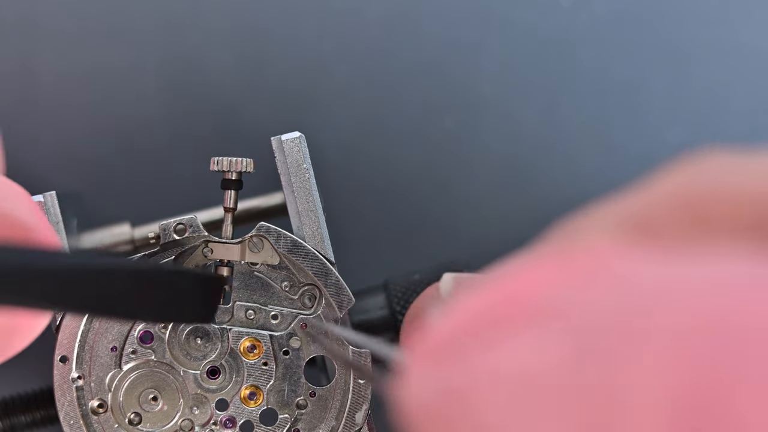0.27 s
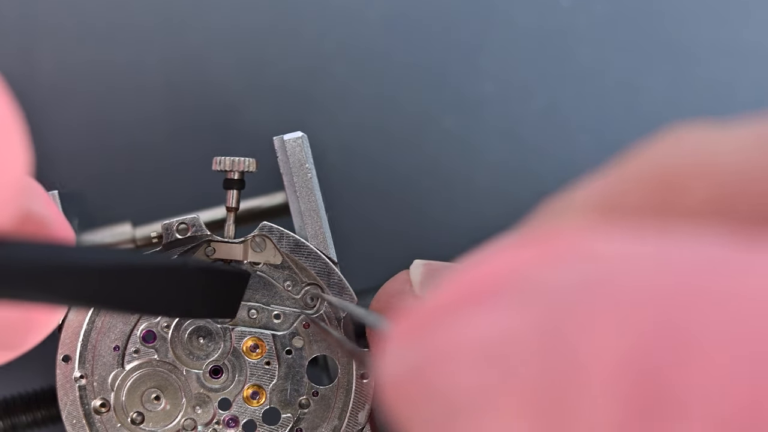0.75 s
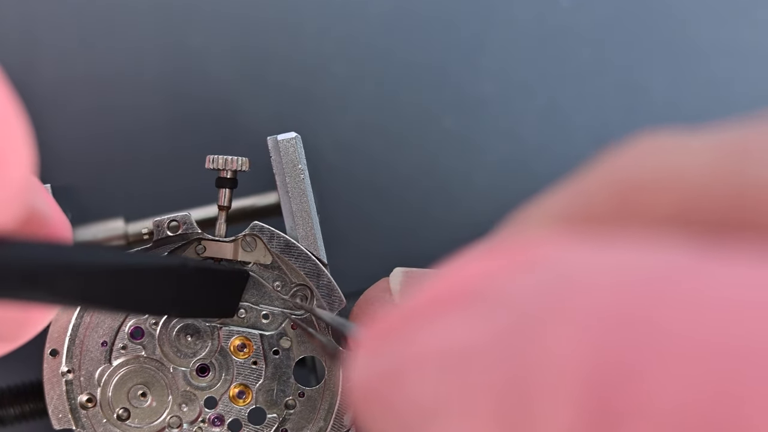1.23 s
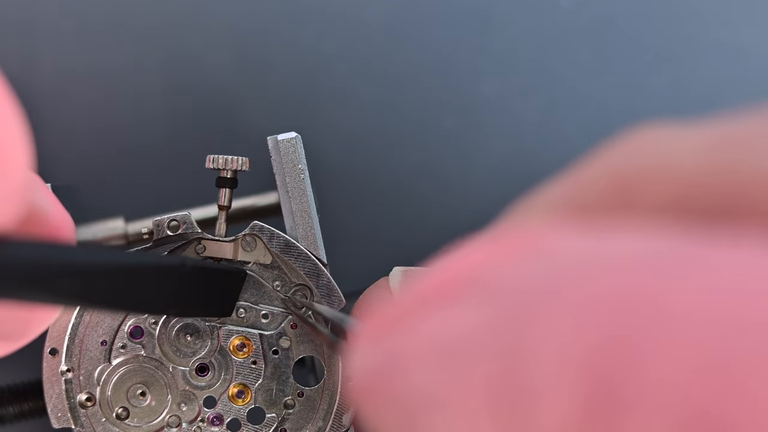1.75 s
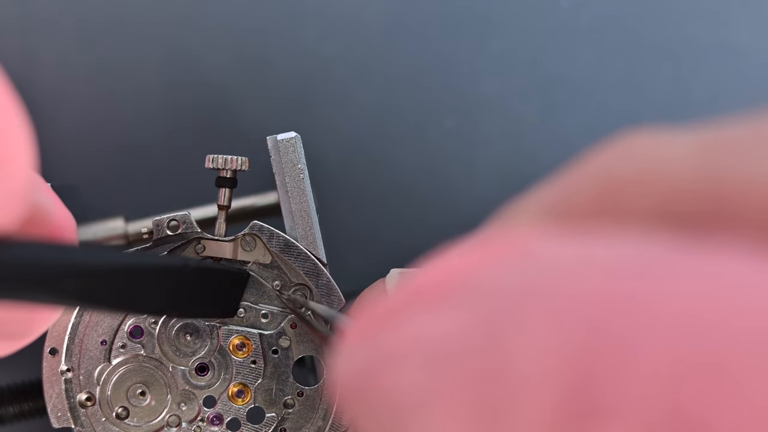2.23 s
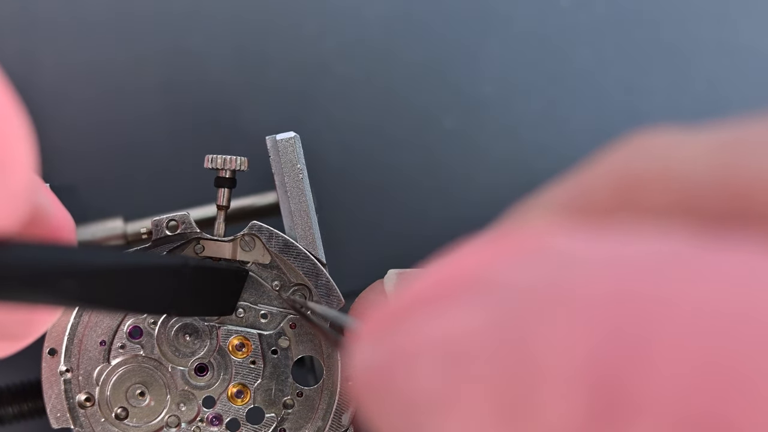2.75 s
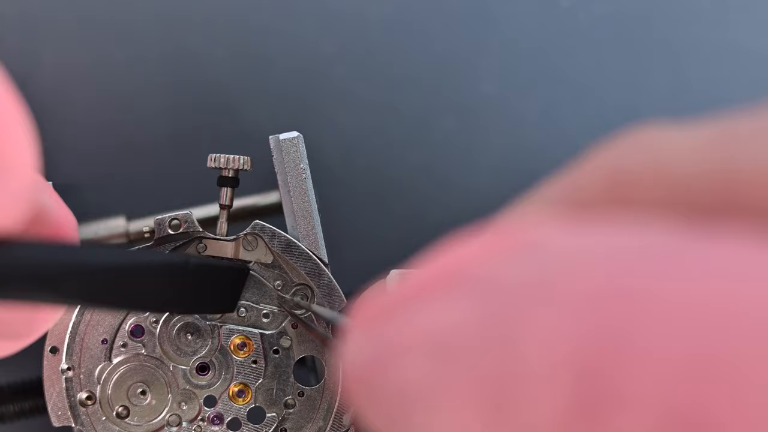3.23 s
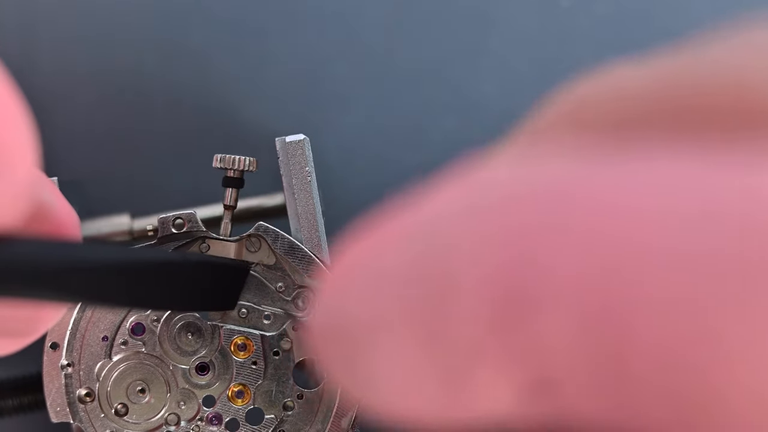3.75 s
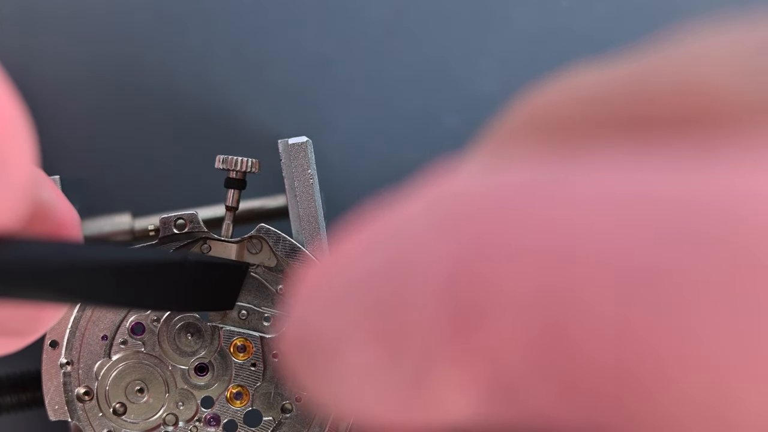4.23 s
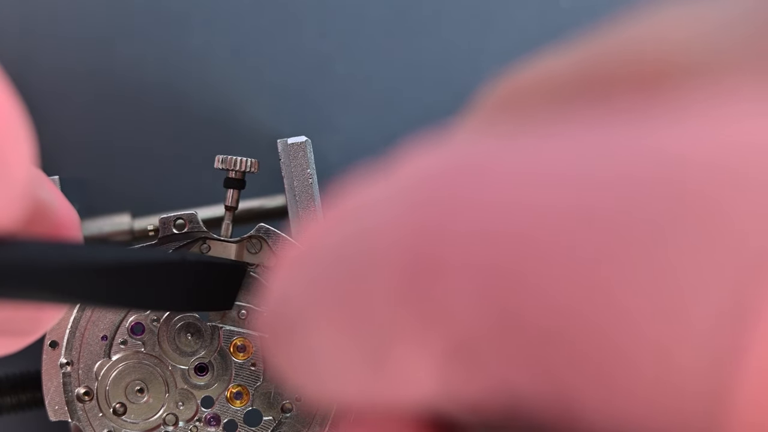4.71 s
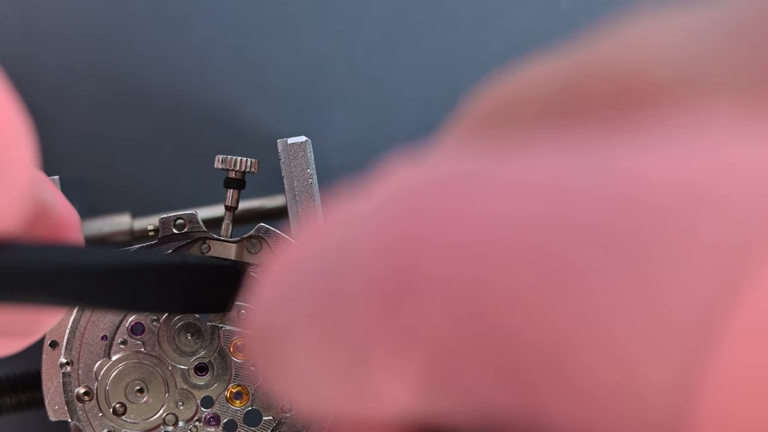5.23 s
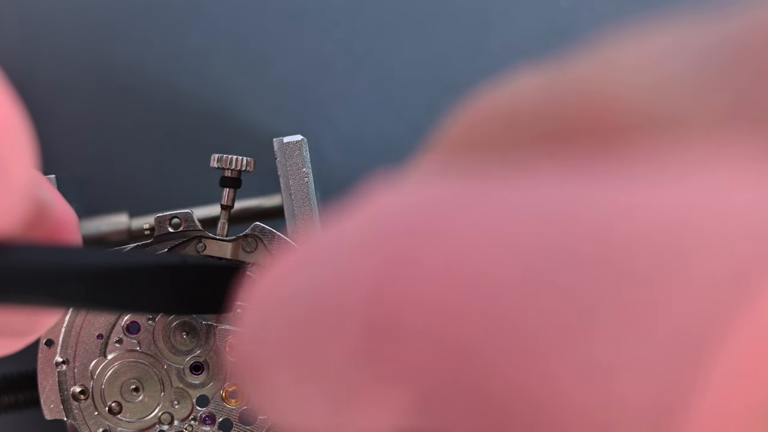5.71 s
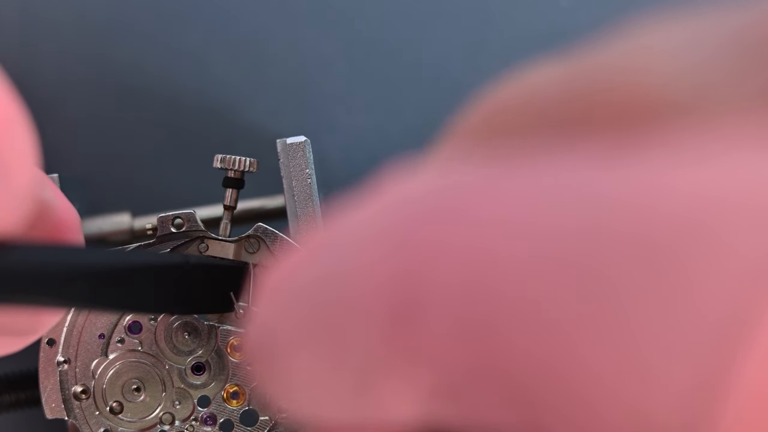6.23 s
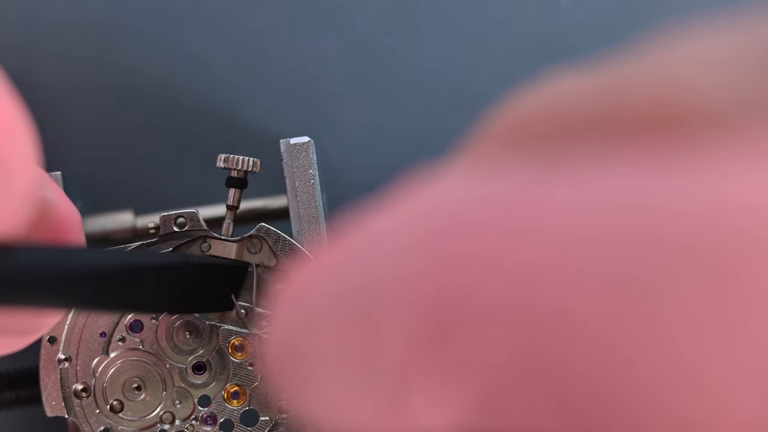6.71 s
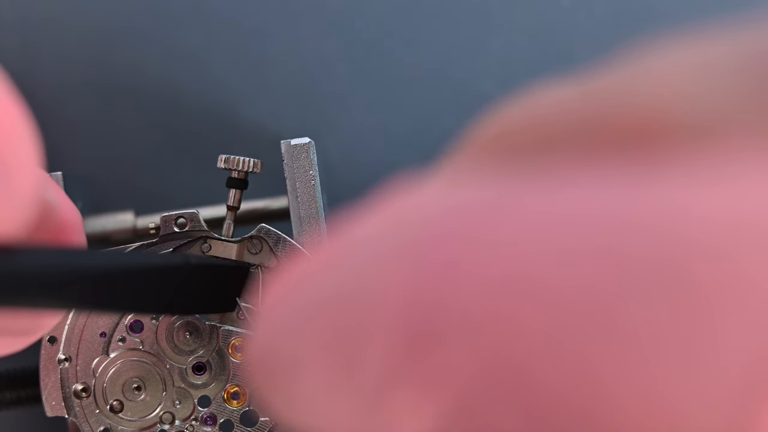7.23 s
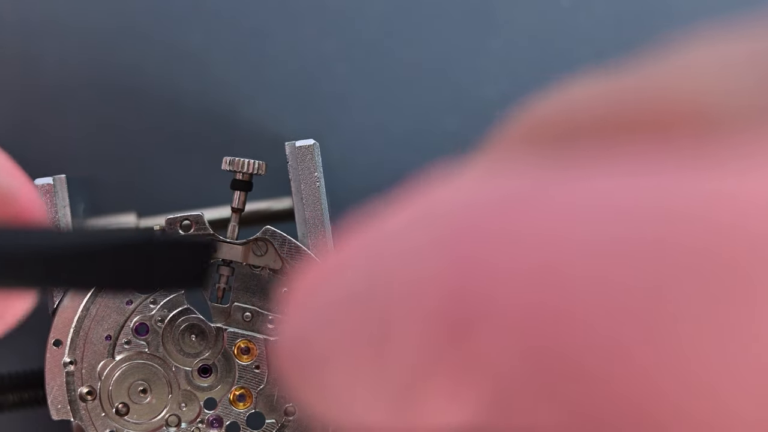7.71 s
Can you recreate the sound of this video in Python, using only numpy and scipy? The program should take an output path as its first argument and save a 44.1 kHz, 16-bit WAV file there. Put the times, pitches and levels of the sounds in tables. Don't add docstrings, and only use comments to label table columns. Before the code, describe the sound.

A close pair of microphones hears fine work at a bench in a small room. At 0 s a crisp steel snap sounds, then thin, bright tweezer ticks and faint grazes until 0.7. Dull, short bench knocks begin at 0.9 and cluster to 1.6, with small scuffs near 1.3. It stays sparse, with light nudges, until a loud hard snap and knock at 2.84. Knocks and ticks thicken from 3.1; at 3.5-3.65 a hand drags in a rough, juddering stick-slip scuff. Firm knocks with small metallic pings follow from 3.9 to 4.7, then more spaced ones around 5.1, 5.4 and 6. The sharpest snap cracks at 6.24. Light touches lead to knocks at 7.4 and 7.6 and a tight flurry of clicks at 7.75. Behind everything, a far piston engine hums low near 70 Hz, dipping slightly in pitch, wavering, strongest midway, fading after 6.3, with soft rumble and airy hiss.

```python
import sys
import numpy as np
from scipy import signal
from scipy.fft import rfft, irfft, next_fast_len
from scipy.io import wavfile
from scipy.ndimage import map_coordinates

SR = 44100
rng = np.random.default_rng(int(sys.argv[2]) if len(sys.argv) > 2 else 0)


def elevation(decibels):
    levels = np.asarray(decibels, float)
    return 10 ** (levels / 20)


def int16_out(signal):
    q = np.round(np.clip(np.atleast_2d(signal).T, -1, 1) * 32767)
    wavfile.write(sys.argv[1], SR, q.astype(np.int16))


N = 351036

# time_s, firing_hz, nearness_db
ENGINE_PASS = [(0.0, 75.5, -10.5), (0.8, 73.75, -2.5), (1.7, 72.73, -0.5), (2.3, 71.86, 5.5),
               (2.86, 70.8, 0), (3.4, 70.5, 3.5), (4.5, 69.65, 6.5), (4.96, 70.34, 0.5), (5.2, 70.64, 3),
               (5.6, 71.37, 5.5), (6.3, 73.45, -1), (6.8, 73.96, -5.5), (7.1, 72.76, -7.5),
               (7.56, 75.46, -8), (7.96, 74.8, -11)]
# level_db, nearness_share, drift_db_per_s (exhaust turns away)
ORDER_RULES = [
    (-51, 1, 0.3),
    (-57, 0.52, 0.13),
    (-53, 0.37, -1.5),
    (-52.5, 0.12, -0.56),
]
# time_s, gain_db, width_s
ORDER_PATHS = [
    [(4.8, -13, 0.11), (5.94, -12.5, 0.11), (6.63, -31, 0.062)],
    [(1.24, 6, 0.1), (1.7, -4, 0.3), (3.5, 10, 0.84), (4.78, 11, 0.14), (4.97, -8, 0.11), (6.0, -7.5, 0.22),
     (6.29, -21, 0.034), (6.54, 1.5, 0.093)],
    [(1.42, -19, 0.088), (2.22, -18.5, 0.17), (2.86, -7, 0.15), (4.2, 5.5, 0.69), (6.33, -23, 0.072)],
    [(0.2, 3, 0.16), (1.7, 4, 0.18), (2.1, -10, 0.076), (2.3, 11.5, 0.076), (4.4, -9, 0.55),
     (4.79, -16, 0.074), (4.96, 7, .08), (5.25, 10, 0.066), (6.25, -13, 0.12), (6.63, -12, 0.065),
     (7.09, -15, 0.17)],
]
# freq_hz, density_db_per_hz
ROAR_SPECTRUM = [(12, -45), (20, -7), (30, -12.5), (50, -3.5), (80, -5), (98, 0), (115, 3.5), (132, -4),
                 (170, -12.5), (205, -3.5), (245, -8), (274, -24), (390, -57), (660, -120)]
# freq_hz, density_db_per_hz
AIR_SPECTRUM = [(160, -20.5), (270, -3.5), (289, -1), (592, -10), (691, -9.5), (752, -12), (1040, -13),
                (2130, -20.5), (10100, -32), (14900, -33), (16000, -30.5)]
# freq_hz, correlation
LIKENESS = [(60, 0.76), (150, 1), (380, 0.71), (950, 0.49), (2380, -0.14), (5980, -0.062), (15000, -0.19)]
# freq_hz, t60_s
ROOM_DECAY = [(300, 0.14), (2000, 0.22), (15000, 0.31)]
# start_s, pitch_hz, peak_db
PINGS = [(1.246, 2270, -54), (1.279, 3010, -68), (3.128, 7740, -53.5), (3.1285, 14300, -55),
         (3.129, 2320, -45.5), (3.348, 2290, -60), (3.478, 2300, -58), (3.828, 4060, -63),
         (4.172, 3400, -63), (4.374, 3150, -57), (4.406, 3340, -54.5), (4.4065, 7800, -63),
         (4.616, 2500, -62), (4.651, 3390, -54.5), (4.652, 5370, -64), (5.37, 1420, -44.5),
         (5.377, 830, -46), (5.98, 3400, -53.5), (7.3825, 3400, -64), (7.7545, 4080, -58)]

# freq_hz, level_db, t60_s, rise_s
THUD_MODES = [(247, -7, 0.09, 0.0075), (521, 3.5, 0.062, 0.00396), (334, -16.5, 0.2, 0.0024)]
# freq_hz, level_db, t60_s, rise_s
BENCH_MODES = [(389, -12, 0.071, 0.00465), (483, -17, 0.068, 0.00405), (546, 0, 0.043, 0.00408),
               (590, 1, 0.059, 0.00398), (641.4, 2, 0.047, 0.00351), (697, -4.5, 0.064, 0.002916),
               (825, -6.5, 0.039, 0.002995)]
# freq_hz, level_db, t60_s, rise_s
UPPER_MODES = [(881, -11.5, 0.07, 0.00204), (916, -3, 0.039, 0.001947), (1037, -2, 0.031, 0.00149),
               (1178, -5.5, 0.024, 0.00152), (1353, -1.5, 0.0084, 0.001186)]
# freq_hz, level_db, t60_s, rise_s
HOLDER_MODES = [(1510, 6, 0.019, 0.0011), (1560, -3, 0.044, 0.00092), (1926, -4.5, 0.028, 0.00072),
                (2310, -2, 0.017, 0.00035), (2536, -10, 0.027, 0.00025), (2920, -16, 0.012, 0.00048),
                (3359.4, -21, 0.019, 0.0004)]
# peak_s, rise_s, fall_s, drag_db, rasp_db
SCUFFS = [(1.301, .02, 0.047, -50, -62), (1.2792, .001, .016, -64, -53), (1.2898, .001, 0.014, -62, -50.5),
          (7.75, 0.033, .04, -70, -69), (0.937, .012, .05, -58, -69), (1.012, .02, .04, -70, -72),
          (1.14, .03, .05, -56, -67), (1.37, .07, .06, -57, -71), (2.03, .012, .25, -60, -78),
          (2.3165, .002, 0.023, -68, -60.5), (2.322, 0.028, 0.21, -59.5, -72),
          (3.132, 0.033, 0.019, -43, -55), (2.93, 0.016, 0.068, -56, -68), (4.79, 0.28, 0.15, -73, -70)]
# freq_hz, density_db_per_hz
RASP_SPECTRUM = [(790, -13), (1350, -6), (1440, -1.5), (1660, -6.5), (2170, -15), (2520, -9), (2900, -17),
                 (4870, -23.5), (6850, -33), (16000, -47)]
# time_s, pressure_db
PUSH = [
    (3.4, -52.5),
    (3.418, -48),
    (3.44, -52),
    (3.485, -54),
    (3.515, -39.5),
    (3.55, -38),
    (3.62, -35),
    (3.648, -46),
    (3.7, -70),
]
# time_s, peak_db, pitch_hz
JOLTS = [(3.5179, -26, 720), (3.5256, -24.5, 680), (3.5404, -27, 680), (3.5527, -22.5, 755),
         (3.571, -25, 860), (3.5788, -24.5, 700), (3.5888, -25, 640), (3.5921, -22, 980),
         (3.5979, -21, 970), (3.6038, -28, 780), (3.6086, -26, 720), (3.6153, -26, 796), (3.6234, -24, 740),
         (3.6274, -25, 730), (3.6399, -33, 750)]

# freq_hz, level_db, t60_s, rise_s
LOW_RING = [(2340, 4.5, 0.019, 0.00084), (3750, 2, 0.023, 0.000303), (4260, -1, 0.047, 0.000643),
            (4830, -3, 0.027, 0.00057)]
# freq_hz, level_db, t60_s, rise_s
TIP_RING = [(5380, 1, .012, 0.000384), (5330, 6, 0.015, 0.000322), (5880, 5, 0.021, 0.000444),
            (6250, -31, 0.0082, 0.00044)]
# freq_hz, level_db, t60_s, rise_s
MID_RING = [(6760, -1, 0.00913, 0.00067), (8200, 15, 0.029, 0.000453), (9200, 5, 0.029, 0.0012),
            (9000, -5, 0.035, 0.00086), (9900, -5, 0.012, 0.00032), (11530, -11, 0.044, 0.00048)]
# freq_hz, level_db, t60_s, rise_s
TOP_RING = [(12100, -6, 0.0118, 0.00048), (13700, 9, 0.0068, 0.000442), (13750, -6, 0.023, 0.0002),
            (14600, 2, 0.022, 0.00054), (15070, -2, 0.028, 0.000382), (15169, -3, 0.019, 0.0014)]
# freq_hz, left_lead_rad
STEEL_LEAD = [(1500, .5), (3000, 1.3), (5000, 0.7), (7000, 0), (9000, 1.5), (11000, 2), (13000, 1.5),
              (15000, 2.6)]
# start_s, peak_db, low_ring_db, tip_ring_db, top_ring_db
TICKS = [(0.308, -44, -36, -36, -16.5), (0.4493, -45.5, -30, -28.5, -22.5), (0.4919, -52.5, -22, -18.5, -7),
         (0.6722, -49, -27, -25, -19), (1.136, -49.5, -22, -19, -12), (1.2455, -52, -16, -20.5, -22),
         (3.1284, -43, -15.5, -28, -18), (3.786, -47.5, -22, -22, -5.5), (3.8183, -51, -17, -17, -10.5),
         (3.915, -52, -15, -25, -20), (4.374, -54, -10, -18.5, -21.5), (4.4052, -48.5, -14, -22, -24),
         (4.6056, -50, -12, -17, -14), (4.616, -59, -11, -14, -14), (5.366, -49.5, -10, -16, -21),
         (5.375, -54.5, -11, -16.5, -16), (5.9793, -54.5, -7.5, -19, -16), (7.7468, -44, -22, -27, -12),
         (7.7544, -51, -20, -13, -11)]
# start_s, peak_db, depth_db (+ shank, low; - point, high)
GRAZES = [(0.1901, -59, -5), (0.2614, -61, -2), (0.391, -58, -1), (1.2796, -60, -2), (1.29, -53, 6),
          (1.3547, -61, -6), (1.4124, -53.5, -7), (1.5683, -63, -4), (1.5932, -54, -4), (2.3155, -62, 4),
          (2.379, -61, 2), (2.99, -63, -9), (3.3964, -57, 5), (3.4451, -61, 7), (3.715, -53, -0.5),
          (4.1707, -66, 10), (4.649, -58, 6), (5.092, -56.5, 3), (5.238, -65, 0.1), (6.2454, -53, -8),
          (6.4025, -58, -8), (6.5794, -55.5, -6), (7.3423, -60, -6), (7.3765, -56, -2)]
# (freq_hz, level_db, t60_s)
SNAPS = [
    (0.0046, -40.5, .00005, [(2250, -15, 0.024), (3860, -14, 0.015), (5740, -15, 0.016), (7499, -38, 0.057), (8600, -21, 0.028), (11420, -37, 0.023), (14850, -5, 0.0091)]),
    (2.8431, -30, 0.00014, [(2040, -14, 0.022), (4064, -2, 0.017), (5650, -2, 0.018), (5780, -5, 0.018), (4450, -1, 0.012), (8580, -3, 0.019), (9647, -27, 0.024), (10500, -10, 0.012), (11480, -20, 0.032), (13900, 0, 0.016), (14270, -7, 0.023), (14600, -7, 0.029), (14950, -18, 0.054)]),
    (4.6005, -46.5, .002, [(2460, -9, 0.035), (3865, -7, 0.041), (4080, -1, 0.015), (5529, -5, 0.039), (8200, 0, 0.023), (10400, -15, 0.054), (12500, -11, 0.053), (14500, -9, 0.037)]),
    (6.2367, -23, 0.000088, [(2246, -15, 0.027), (4140, -9, 0.023), (4780, -15, 0.032), (5820, -0.5, 0.014), (3650, -15, 0.01), (7760, -25, 0.038), (8500, -3, 0.014), (8830, -3, 0.014), (8670, -24, .07), (11640, -10, 0.021), (13070, -22, 0.018), (11620, -22, .05), (14800, -22, 0.03), (15000, -2.5, 0.012)]),
    (7.7583, -37.5, .0015, [(2353, -17.5, 0.035), (4120, -8, 0.02), (5970, -8, 0.013), (8000, -19, 0.018), (10080, -15, 0.019), (11670, -15, 0.019), (13400, -23, 0.038), (14420, -2, 0.01), (14940, -30, .03), (15300, -6, 0.018)]),
]

# start_s, peak_db, upper_db, holder_db
KNOCKS = [(0.88, -35.5, -12.5, -19.5), (1.08, -31, -12, -19), (1.133, -45, -16, -20),
          (1.189, -32, -15, -23), (1.291, -30, -12.5, -16), (1.592, -38, -11, -20.5),
          (2.845, -36.5, -13, -13), (2.964, -38.5, -11.5, -23), (3.127, -42, -4, -8),
          (3.192, -37, -14.5, -18.5), (3.291, -34, -14, -18.5), (3.348, -33, -8.5, -25),
          (3.447, -27.5, -16, -26.5), (3.479, -41, -16, -18), (3.494, -29.5, -11, -32),
          (3.916, -29, -11.5, -22), (4.084, -37.5, -16, -40), (4.171, -31, -7, -30.5),
          (4.376, -30, -8, -26), (4.405, -26.5, -4, -22), (4.602, -31.5, -11.5, -32),
          (4.6527, -31.5, -6.5, -19.5), (5.116, -33.5, -12.5, -29), (5.368, -43.5, -11, -12),
          (5.782, -41, -19, -25), (5.981, -33.5, -3.5, -18), (6.149, -39.5, -7.5, -19),
          (6.441, -39.5, -9.5, -26.5), (7.382, -34, -6.5, -28), (7.621, -36, -16, -23)]
# start_s, peak_db, hardness_db
NUDGES = [(1.246, -48, 8), (1.278, -53, 10), (1.426, -44, -4), (1.698, -46.5, 1), (1.784, -45, -9),
          (1.933, -50.5, -3), (2.336, -47, 3), (2.39, -48, -2), (2.542, -44.5, 2), (2.916, -43, -6),
          (3.052, -46.5, -1), (3.216, -46.5, 3), (3.397, -49, 5), (3.717, -44.5, 4), (3.77, -49, 5.5),
          (3.784, -45, 4), (3.818, -47, -0.5), (4.208, -43.5, -0.5), (4.305, -44, 5), (4.863, -48.5, 2),
          (4.608, -39.5, -3), (3.418, -37, 0), (3.425, -40, -4), (3.779, -52, 5), (5.376, -49, 3),
          (5.768, -46, 3), (6.2375, -45.5, 5), (6.264, -47.5, 3), (6.592, -45.5, 6), (6.686, -44.5, 0),
          (6.969, -47.5, 8.5), (7.242, -51, 6), (7.459, -44.5, -13), (7.748, -55, -8)]
TOUCHES = [0.933, 1.054, 1.572, 1.766, 2.012, 2.317, 3.029, 4.024, 5.094, 5.24, 6.353, 7.17, 7.678]
# time_s, peak_db, pitch_hz
PUNCHES = [(0.8817, -37, 637), (1.0826, -33.5, 610), (1.1914, -33, 630), (1.2932, -31.5, 610),
           (2.969, -39, 700), (3.1313, -38, 1120), (3.1943, -38, 610), (3.2925, -34, 620),
           (3.3515, -34.5, 730), (3.4499, -34, 650), (3.4965, -29.5, 780), (3.9182, -30.5, 710),
           (4.0862, -39.5, 720), (4.1733, -30.5, 860), (4.3779, -31.5, 700), (4.4064, -27, 824),
           (4.6533, -26.5, 880), (5.1185, -36, 710), (5.9815, -29.5, 820), (6.1498, -40, 810),
           (7.3852, -35, 690), (7.6233, -37.5, 710)]

ROAR_DB, ROAR_NEARNESS_SHARE = -53, 0.29
AIR_DB, AIR_NEARNESS_SHARE = -64.5, 0.075
EARLIER_DB, EARLIER_T60_S = -68, 0.45
PING_T60_S, PING_RISE_S = 0.029, 0.000687
SLIDE_RANGE_DB = 36.5
PUSH_RASP_DB, RASP_PRESSURE_SHARE = -52, 0.84
GRAZE_LOW_DB, GRAZE_TIP_DB, GRAZE_TOP_DB = -15, -23.5, -16
SNAP_RISE_S, SNAP_LONGEST_T60_S = 0.0003, 0.08
SNAP_CRACK_DB, SNAP_CRACK_T60_S = -7.5, 0.013
LIGHT_UPPER_DB, LIGHT_HOLDER_DB = -11.5, -23
TOUCH_DB, TOUCH_HARDNESS_DB = -54.5, 2.5
BENCH_LIFE = 0.88
PUNCH_RING_LATE_S, PUNCH_RING_DB = 0.002, -9
SHARP_PUNCH_HZ = 760
BAND_LIMIT_HZ = 15900


def unit(x):
    return x / np.sqrt(np.mean(x ** 2) + 1e-20)


def along(points, hz):
    point_hz, value = np.transpose(points)
    return np.interp(np.log(hz + 1), np.log(point_hz + 1), value)


def curves(rows, outside=None):
    time_s, *columns = np.transpose(rows)
    t = np.arange(N) / SR
    return [np.interp(t, time_s, column, outside, outside) for column in columns]


def wobble(rate_hz):
    knots = rng.standard_normal(int(N * rate_hz / SR) + 4)
    return map_coordinates(knots, [np.arange(N) * rate_hz / SR])


def bump(t, center_s, width_s):
    return np.exp(-((t - center_s) / width_s) ** 2)


def filtered(x, response):
    m = next_fast_len(N + SR // 2)
    return irfft(rfft(x, m) * response(np.fft.rfftfreq(m, 1 / SR)), m)[..., :N]


def rush(spectrum, source):
    def response(hz):
        turn = np.arccos(np.clip(along(LIKENESS, hz), -1, 1)) / 2
        return elevation(along(spectrum, hz)) * [np.cos(turn), np.sin(turn)]
    mid, side = filtered(source, response)
    return unit(np.array([mid + side, mid - side]))


def ring(modes, scatter_db, detune, apart_hz, contact_s, life=1, steel=False):
    hz, db, t60_s, rise_s = np.transpose(modes)[:, :, None]
    t60_s = t60_s * np.clip(life, 0.3, 2)
    t = np.arange(int(SR * t60_s.max())) / SR
    size, shift, apart = rng.standard_normal((3, len(modes), 1))
    decay = np.exp(-np.log(1000) * t / t60_s)
    rise = 1 - np.exp(-(t / rise_s) ** 2)
    shape = elevation(db + scatter_db * size) * decay * rise
    phase = 2 * np.pi * hz * (1 + detune * shift) * (t - rise_s)
    mid = np.sum(shape * np.sin(phase), 0)
    if steel:
        lead = np.clip(along(STEEL_LEAD, hz) + 0.15 * apart, -2.7, 2.7)
        side = np.sum(shape * np.cos(phase) * np.tan(lead / 2), 0)
    else:
        side = np.sum(shape * np.cos(phase + 0.4 * apart) * apart * hz / apart_hz, 0)
    n_force = SR // 200
    force = rng.standard_normal(n_force) * np.exp(-np.arange(n_force) / SR / contact_s)
    mid, side = np.convolve(mid, force), np.convolve(side, force)
    return np.array([mid + side, mid - side]) / np.abs(mid).max()


def empty_track():
    return np.zeros((2, N + SR))


def add(track, start_s, sound):
    start = round(start_s * SR)
    track[:, start:start + sound.shape[1]] += sound


def crack_noise(n):
    return signal.lfilter([1, -0.65], 1, rng.standard_normal((2, n + 1)))[:, 1:]


def earlier_tail():
    decay_db = -60 * np.arange(N) / SR / EARLIER_T60_S
    return elevation(EARLIER_DB + decay_db) * np.diff(rng.standard_normal((2, N + 1)))


def room(x):
    hz, t, z = signal.stft(rng.standard_normal((2, SR // 3)), SR, nperseg=256)
    decay = elevation(-60 * t / along(ROOM_DECAY, hz)[:, None])
    tail = signal.istft(z * decay, SR, nperseg=256)[1]
    delayed = np.pad(x, ((0, 0), (180, 0)))
    return signal.fftconvolve(delayed, tail / np.linalg.norm(tail[0]), axes=1)[:, :N]


def engine():
    firing_hz, near_db = curves(ENGINE_PASS)
    t = np.arange(N) / SR
    phase = 2 * np.pi * np.cumsum(firing_hz) / SR
    orders = np.zeros(N)
    for order, (db, share, drift), paths in zip((1, 2, 3, 0.5), ORDER_RULES, ORDER_PATHS):
        path_db = sum(gain_db * bump(t, s, width_s) for s, gain_db, width_s in paths)
        level_db = db + share * near_db + drift * t + path_db + 1.58 * wobble(10)
        orders += np.sqrt(2) * elevation(level_db) * np.sin(order * phase + 0.27 * order * wobble(8.3))
    orders += elevation(-76.5 + 5.1 * wobble(2.47)) * np.sin(5 * phase + 0.71 * wobble(9.8))
    roar_db = ROAR_DB + ROAR_NEARNESS_SHARE * near_db + 1.74 * wobble(5.0)
    roar = elevation(roar_db) * rush(ROAR_SPECTRUM, rng.standard_normal((2, N)))
    air_db = AIR_DB + AIR_NEARNESS_SHARE * near_db
    air = elevation(air_db) * rush(AIR_SPECTRUM, rng.standard_normal((2, N)))
    return orders * elevation([[-0.2], [0.2]]) + roar + air


def pings():
    track = empty_track()
    for s, hz, db in PINGS:
        mode = [(hz, 0, PING_T60_S, PING_RISE_S)]
        add(track, s, elevation(db) * ring(mode, scatter_db=0, detune=0, apart_hz=9000, contact_s=0.0002))
    return track[:, :N]


def scuffs():
    t = np.arange(N) / SR
    grip = elevation(1.2 * wobble(130))
    slips = rng.standard_normal(N) * grip
    modes = ring(THUD_MODES + BENCH_MODES[1:] + UPPER_MODES, scatter_db=1.8, detune=0.00084, apart_hz=5130,
                 contact_s=0.00008, life=0.91)
    drag = unit(signal.fftconvolve(slips[None], modes, axes=1)[:, :N])
    rasp = rush(RASP_SPECTRUM, rng.standard_normal((2, N)) * grip)
    push_db, = curves(PUSH, outside=-120)
    catch_db = sum(0.72 * max(db + 27.5, 0) * bump(t, s, 0.002) for s, db, _ in JOLTS)
    push_rasp_db = PUSH_RASP_DB + RASP_PRESSURE_SHARE * (push_db - push_db.max()) + 5.5 + catch_db
    out = elevation(push_db) * drag + elevation(push_rasp_db) * rasp
    for s, rise_s, fall_s, drag_db, rasp_db in SCUFFS:
        stroke = elevation(-SLIDE_RANGE_DB * np.maximum((s - t) / rise_s, (t - s) / fall_s))
        out += stroke * (elevation(drag_db) * drag + elevation(rasp_db + 4.0) * rasp)
    return out


def swings(rows, half_width_cycles, share_db):
    track = empty_track()
    t = np.arange(-400, 400) / SR
    for s, db, hz in rows:
        swing = bump(t, 0, half_width_cycles / hz) * np.cos(2 * np.pi * hz * t + 2.37)
        add(track, s + t[0], elevation(db + share_db) * swing * elevation([[-0.3], [0.3]]))
    return track[:, :N]


def knocks():
    track = empty_track()
    light = NUDGES + [(s, TOUCH_DB, TOUCH_HARDNESS_DB) for s in TOUCHES]
    blows = KNOCKS + [(s, db, LIGHT_UPPER_DB + hard_db, LIGHT_HOLDER_DB + hard_db) for s, db, hard_db in light]
    for s, db, upper_db, holder_db in blows:
        low_s, low_db, upper_s = s, db, s
        for punch_s, _, punch_hz in PUNCHES:
            if abs(s - punch_s) < 0.006:
                low_s, low_db = punch_s + PUNCH_RING_LATE_S, db + PUNCH_RING_DB
                if punch_hz > SHARP_PUNCH_HZ:
                    upper_s, upper_db = low_s, upper_db + PUNCH_RING_DB
        low = ring(BENCH_MODES, scatter_db=4.0, detune=0.02, apart_hz=7051, contact_s=0.0001, life=BENCH_LIFE)
        upper = ring(UPPER_MODES, scatter_db=2.0, detune=0.026, apart_hz=3949, contact_s=0.0001, life=BENCH_LIFE)
        holder = ring(HOLDER_MODES, scatter_db=1.0, detune=0.025, apart_hz=2500, contact_s=0.00032)
        add(track, low_s - 0.0022, elevation(low_db - 3.0) * low)
        add(track, upper_s - 0.0014, elevation(db + upper_db + 3.0) * upper)
        add(track, s - 0.0014, elevation(db + holder_db + 4.5) * holder)
    return track[:, :N]


def ticks():
    track = empty_track()
    t = np.arange(SR // 30) / SR
    grazes = [(s, db, GRAZE_LOW_DB + depth_db, GRAZE_TIP_DB, GRAZE_TOP_DB - depth_db) for s, db, depth_db in GRAZES]
    for s, db, low_db, tip_db, top_db in TICKS + grazes:
        low = ring(LOW_RING, 1.5, detune=0.032, apart_hz=6007, contact_s=0.00035, life=0.77, steel=True)
        tip = ring(TIP_RING, 4.0, detune=0.012, apart_hz=12050, contact_s=0.00029, life=0.64, steel=True)
        top = ring(TOP_RING, 3.0, detune=0.0074, apart_hz=10500, contact_s=0.00048, life=0.55, steel=True)
        mid = ring(MID_RING, 9.0, detune=0.016, apart_hz=13000, contact_s=0.00029, life=0.44, steel=True)
        crack = elevation(-60 * t / 0.031) * (1 - np.exp(-t / 0.00033)) * crack_noise(len(t))
        layers = [(low_db + 8.5, low), (tip_db + 5.0, tip), (top_db + 0.5, top), (-15.5, mid), (-11.5, crack)]
        for layer_db, layer in layers:
            add(track, s + 0.0004, elevation(db + layer_db) * layer)
    return track[:, :N]


def snaps():
    track = empty_track()
    t = np.arange(SR // 30) / SR
    for s, db, contact_s, modes in SNAPS:
        shapes = [(hz, mode_db, min(t60_s, SNAP_LONGEST_T60_S), SNAP_RISE_S) for hz, mode_db, t60_s in modes]
        part = ring(shapes, scatter_db=0, detune=0, apart_hz=9000, contact_s=contact_s, life=0.73, steel=True)
        add(track, s, elevation(db) * part)
        crack_db = db + SNAP_CRACK_DB - 60 * t / (SNAP_CRACK_T60_S + 3 * contact_s)
        add(track, s, elevation(crack_db) * crack_noise(len(t)))
    return track[:, :N]


def scene():
    punches = swings(PUNCHES, half_width_cycles=0.89, share_db=-0.8)
    jolts = swings(JOLTS, half_width_cycles=1.14, share_db=-2.5)
    bench = knocks() + scuffs() + punches + jolts
    steel = ticks() + snaps()
    tail = room(elevation(-12.5) * bench + elevation(-22.5) * steel)
    return earlier_tail() + engine() + pings() + tail + bench + steel


def band_limit(x):
    return signal.sosfilt(signal.butter(12, 16730, fs=SR, output="sos"), x)


def record(dry):
    mix = filtered(dry, lambda hz: elevation(-32 * (hz > BAND_LIMIT_HZ)))
    return band_limit(mix)


dry = scene()
out = record(dry)
int16_out(out)
```